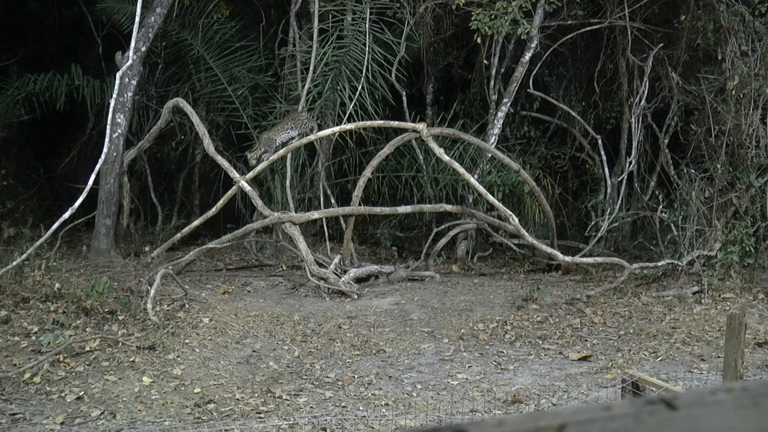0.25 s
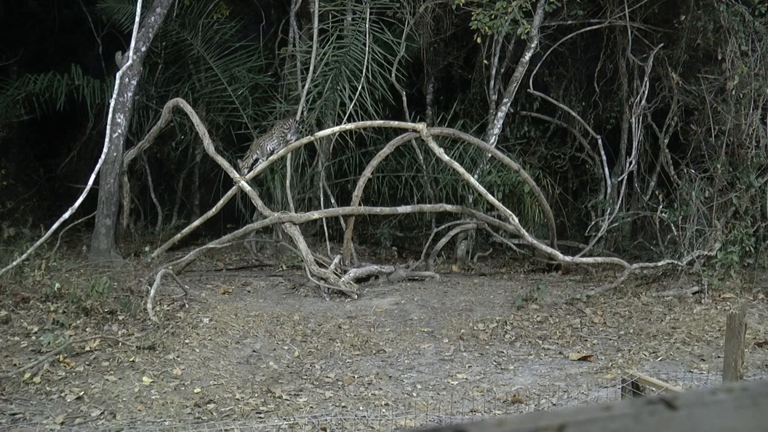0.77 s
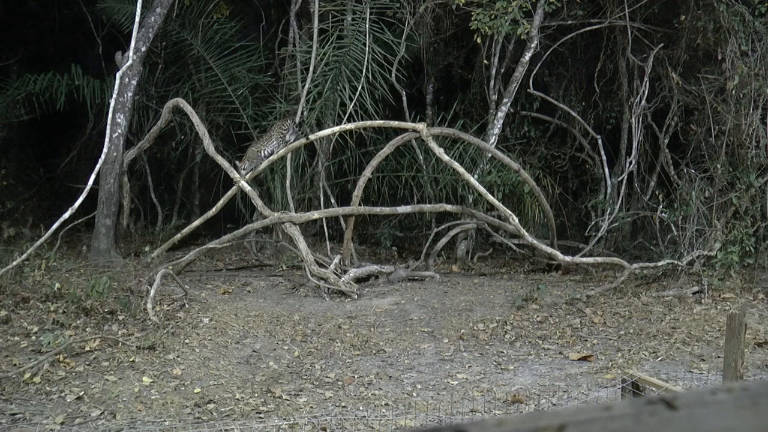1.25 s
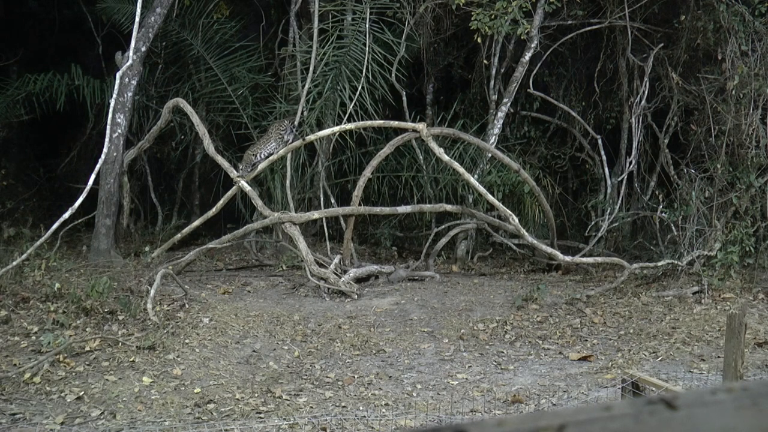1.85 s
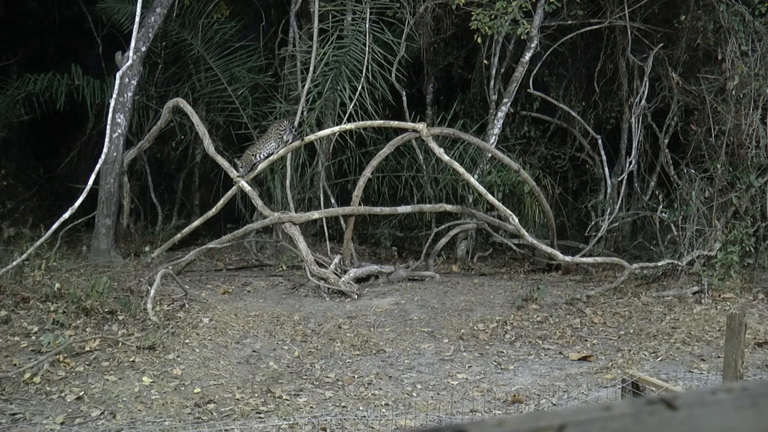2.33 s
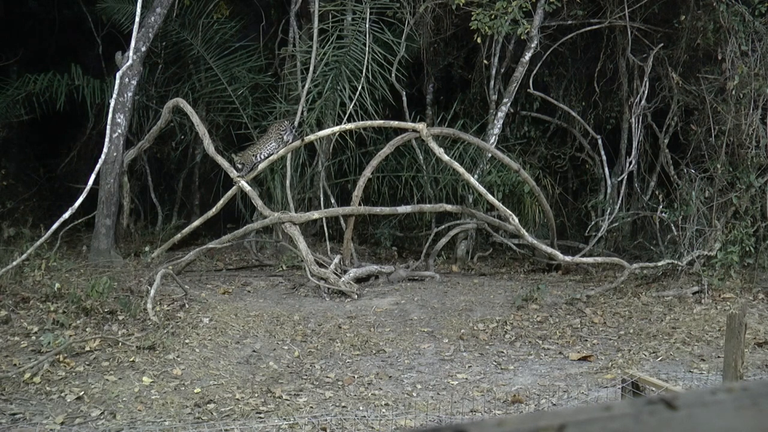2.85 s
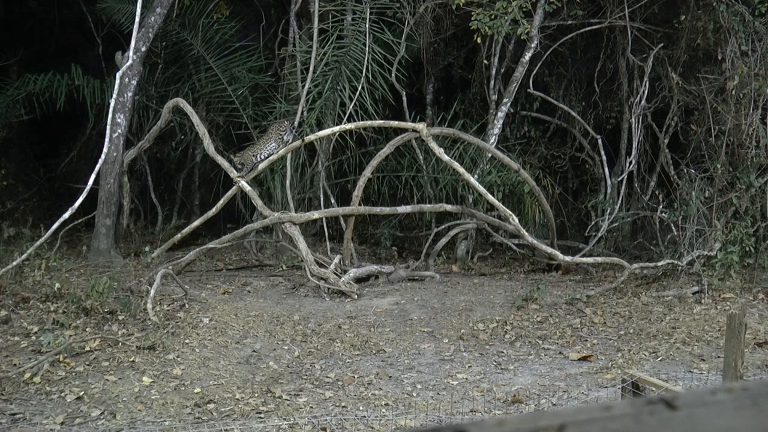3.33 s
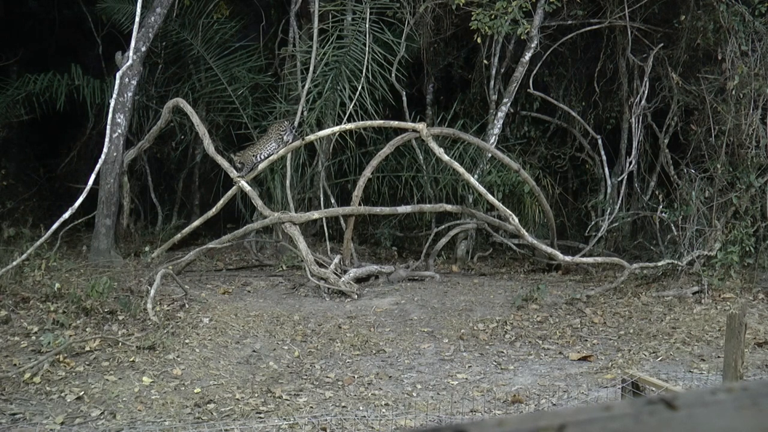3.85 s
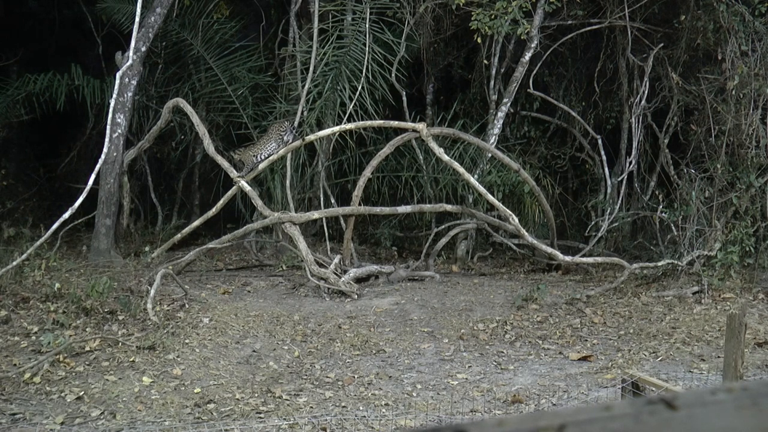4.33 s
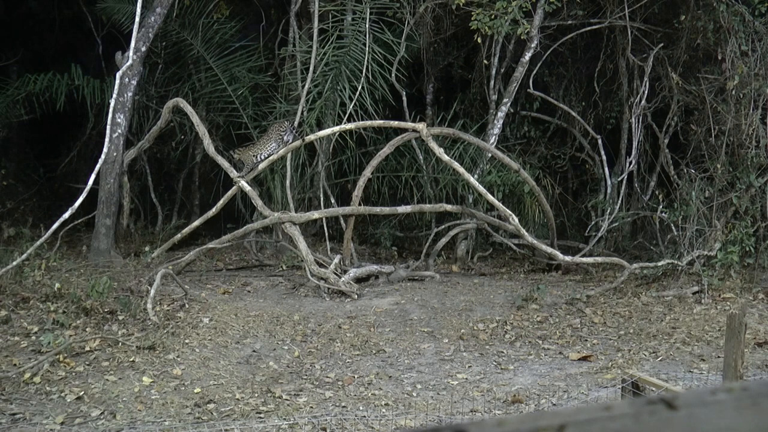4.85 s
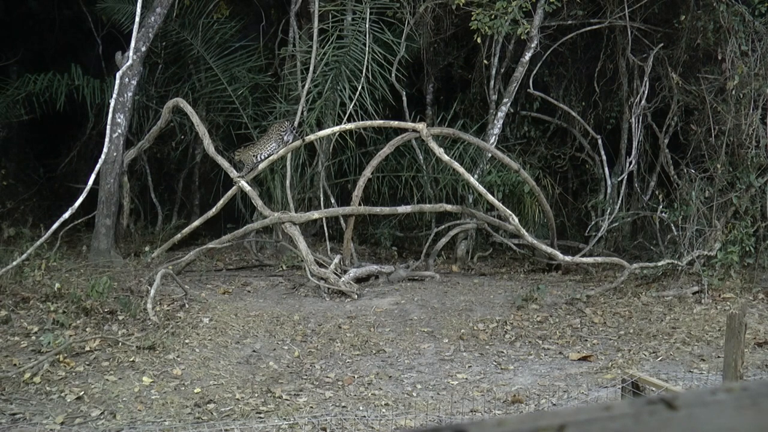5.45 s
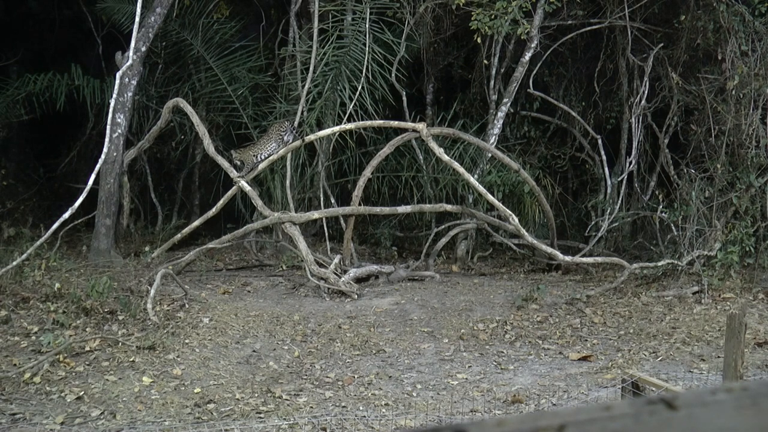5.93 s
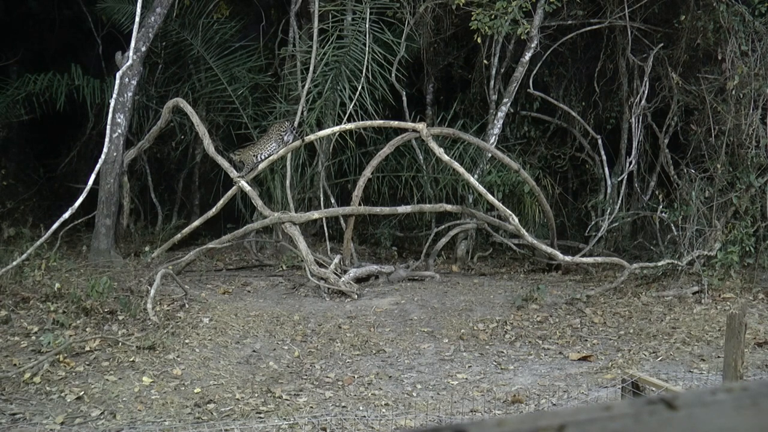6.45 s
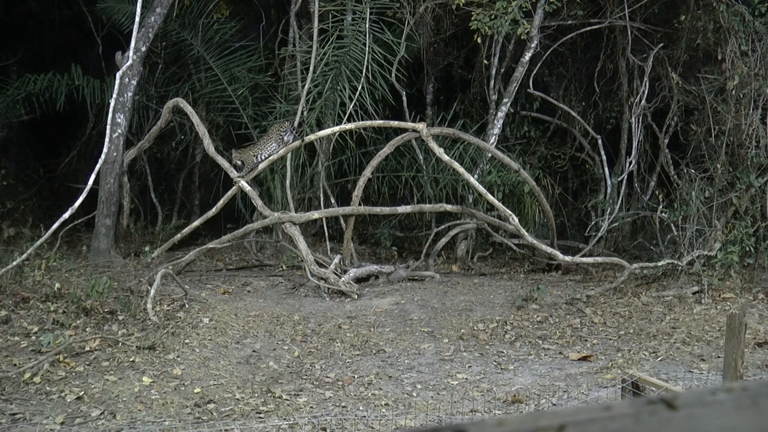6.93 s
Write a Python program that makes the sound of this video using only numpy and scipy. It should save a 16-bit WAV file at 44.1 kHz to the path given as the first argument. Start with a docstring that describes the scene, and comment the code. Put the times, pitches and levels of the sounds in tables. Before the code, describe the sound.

Night insects trill steadily in a forest while dry leaves rustle, twigs snap and a few soft knocks sound on wood.

```python
"""A forest clearing at night. From the start a near katydid scrapes out a high trill with its wings,
over faint air, a cricket chorus and a far buzz. At once dry leaves rustle, bark scrapes and twigs snap,
then return now and then. One cricket begins trilling in bouts, and far insects chirp at their own pace.
After a second a far bird calls. Faint taps lead to soft, close knocks on ringing wood near three seconds.
From four seconds an insect rasps three times, and a low rumble joins the last knocks near seven."""
import sys
import numpy as np
from scipy import signal
from scipy.fft import rfft, irfft
from scipy.io import wavfile
from scipy.ndimage import uniform_filter1d

SR = 44100
rng = np.random.default_rng(int(sys.argv[2]) if len(sys.argv) > 2 else 0)


def bounce(signal):
    """Save signal as a 16-bit WAV file at the path given by the first command-line argument."""
    frames = np.transpose(np.atleast_2d(signal))
    limited = np.clip(frames, -1, 1)
    pcm = np.round(limited * 32767).astype(np.int16)
    wavfile.write(sys.argv[1], SR, pcm)


N = 316638
TIME = np.arange(N) / SR

# Levels in a table compare its rows; the functions set the final loudness.
# the hush of the far forest and still air: f/Hz, level/dB
AIR_SPECTRUM = [(25, -26), (60, 0), (110, 0), (300, 3.5), (520, -3.5), (750, -7), (950, -11), (1500, -9),
                (2100, -8.5), (3900, -9.5), (5900, -4.5), (7100, -10), (8400, -3.5), (12000, -19.5),
                (16000, -17.5)]
# many far insects blurred into a lower and a higher hiss: f/Hz, level/dB
LOW_INSECT_HISS = [(2400, -33), (2650, -12.5), (2900, -10.5), (3300, -9), (3450, -23), (3600, -25),
                   (3800, -58)]
HIGH_INSECT_HISS = [(7400, -48), (8000, -7), (8350, -9), (8500, 7.5), (8900, 5), (9010, 4), (9090, -32)]
# how alike the background is on the left and right: f/Hz, likeness/0-1
STEREO_LIKENESS = [(40, 0.44), (130, 0.21), (300, 0.44), (1400, 0.59), (3100, 0.78), (6800, 1),
                   (11000, 0.48), (15000, 0)]
# how fast the katydid's wings stroke: t/s, rate/Hz
WING_RATE = [(0, 29.82), (2, 29.73), (2.6, 29.68), (7.2, 29.71)]
# the bursts within one wing stroke: place/strokes, half length/strokes, f/Hz, level/dB
WING_BURSTS = [(.12, .025, 8600, -2), (.17, .025, 8546, -2), (.29, .11, 8895, -3.3), (.355, .022, 8765, -3),
               (.48, .075, 8895, -2), (.625, .028, 8600, 2), (.70, .022, 8500, -3), (.81, .035, 8421, -4.5),
               (.965, .025, 8500, -8.5), (.6, .11, 8425, -12)]
# the crickets of the chorus: f/Hz, pulse rate/Hz, level/dB
CHORUS_CRICKETS = [(3305, 86, -62), (3255, 52, -65), (3190, 103, -67.5), (3090, 44, -66.5), (2980, 62, -68),
                   (2900, 73, -71), (3355, 22.5, -70)]
# moments when the buzz grows louder: t/s, half length/s, rise/dB
BUZZ_RISES = [(1.88, 0.11, 4.5), (4.42, 0.22, 3), (6.25, 0.17, 5.5)]
# dry leaves shifting: t/s, length/s, level/dB, f/Hz, half width/octaves
LEAF_RUSTLES = [(0.072, .1, -55.5, 3270, 1.48), (0.29, .075, -59.5, 6500, 1.1),
                (0.819, 0.29, -64.5, 2460, 2), (2.419, .22, -62, 2740, 1.94), (2.773, .14, -57.5, 3850, 4),
                (3.323, .3, -59.5, 2330, 2.03), (3.488, .1, -59, 780, 2.55), (4.453, .074, -57, 4000, 0.46),
                (4.905, 0.067, -59.5, 2900, 0.52), (5.147, 0.25, -66.5, 1900, 2.1),
                (5.726, .12, -60, 7100, 0.85), (6.259, 0.36, -62, 2930, 1.86),
                (6.826, .11, -59.5, 5040, 3.4), (7.09, 0.1, -60.5, 5340, 1.5)]
# bark being scraped: t/s, level/dB
BARK_SCRAPES = [(.113, -56), (2.1, -64.5), (4.453, -57)]
# twigs breaking: t/s, level/dB, f/Hz, half width/octaves, decay/s, splinters against the first click/dB
TWIG_SNAPS = [(.159, -38.5, 6500, 0.61, .0039, 10), (.29, -27, 3800, 1.33, 0.0056, 14),
              (2.0576, -38, 2780, 0.42, .0045, -3), (2.7043, -39.5, 1390, .64, .0034, -5.5),
              (2.8959, -28, 1420, 0.9, 0.0065, 22), (2.976, -14, 1740, 0.77, .0017, -9),
              (3.334, -35, 2950, 1.15, 0.015, 10), (3.58, -41, 2260, 0.37, 0.011, 6),
              (4.263, -43.5, 1710, 0.4, 0.011, 3), (5.185, -45, 2630, 0.22, .0026, 0),
              (5.786, -44, 9700, .68, .004, 8), (6.384, -39, 5000, 1, .0025, 3)]
# three far insects that chirp steadily: first t/s, repeat time/s, f/Hz, level/dB
CHIRPING_INSECTS = [(.76, 0.76, 6290, -71.5), (.36, .615, 6670, -76.5), (1.98, 1.005, 4030, -78.5)]
# bird calls, hoarser the wider they are: t/s, length/s, first f/Hz, last f/Hz, width/Hz, level/dB
BIRD_CALLS = [(1.123, 0.32, 1210, 1242, 12, -74), (1.914, 0.27, 1207, 1350, 27, -73.5),
              (2.472, 0.21, 1300, 1400, 14, -75), (5.698, 0.75, 1094, 1039, 560, -72),
              (6.2, 0.607, 1372, 1410, 49, -71), (6.838, 0.46, 1105, 1043, 340, -70.5)]
# dull blows on wood: t/s, level/dB, pitch/times the wood's own
WOOD_KNOCKS = [(2.704, -42, 0.93), (2.896, -28, 1.05), (2.9093, -40, 0.84), (2.9757, -33, 0.95),
               (3.333, -36.5, 2.3), (3.335, -43.5, 0.78), (3.366, -45, 0.85), (4.318, -47, 0.95),
               (6.827, -45, 0.67), (6.98, -50.5, 0.6), (7.117, -44, 0.59)]
# the notes the wood rings with: f/Hz, level/dB, time to fade by 60 dB/s
WOOD_NOTES = [(122.3, -23.5, 0.18), (215.6, -7.5, 0.069), (290, 3.5, 0.056), (390, 3.5, 0.036),
              (579, -2, 0.032), (812, -3, 0.028), (1080, -6, 0.032), (1670, -10, 0.038)]
# rasping insect calls: t/s, length/s, first f/Hz, last f/Hz, level/dB
RASP_CALLS = [(4.22, .43, 5450, 5070, -60.5), (5.426, 0.31, 5790, 5250, -64.5),
              (6.284, 0.25, 5920, 5400, -68)]
# pitches that the microphone housing lifts or weakens: f/Hz, width/Hz, gain/dB
HOUSING_BANDS = [(493, 39, -22), (777, 120, 4), (902, 164, -9.5), (1262, 180, -8), (1574, 101, -17),
                 (1720, 290, 2.5), (2260, 230, 2), (2370, 160, -2.5), (6970, 95, 6.5)]


def amp(db):
    """Turns decibels into a number to multiply by."""
    return 10 ** (np.asarray(db) / 20)


def unit_level(x):
    """Scales a signal so its average strength (rms) is 1."""
    return x / np.sqrt(np.mean(x ** 2) + 1e-20)


def curve_at(points, hz):
    """Reads between a table's rows, spacing pitches by octaves."""
    f, value = np.transpose(points)
    return np.interp(np.log(hz + 1), np.log(f), value)


def add(mix, s, sound):
    """Mixes a sound in, starting at s seconds."""
    part = mix[max(round(s * SR), 0):][:len(sound)]
    part += sound[:len(part)]


def angle(hz):
    """The running phase of a wave whose pitch may change."""
    return 2 * np.pi * np.cumsum(hz) / SR


def drift(rate, size=N):
    """A smooth random wander of size about 1, with up to about rate swings a second."""
    f = np.fft.rfftfreq(16384, 1 / 2000)
    slow = unit_level(irfft(rfft(rng.standard_normal(16384)) * np.exp(-(f / rate) ** 2)))
    return np.interp(TIME[:size] * 2000, np.arange(len(slow)), slow)


def band(x, hz, octaves):
    """Keeps the pitches within so many octaves of hz."""
    ratio = 2 ** max(octaves, .05)
    edges = [min(hz / ratio, SR / 3), min(hz * ratio, SR / 2 - 1000)]
    return signal.sosfilt(signal.butter(3, edges, "band", fs=SR, output="sos"), x)


def among_trees(x, fade_s, echo_db, likeness):
    """Adds stereo echoes off trunks and leaves, which drop 60 dB in fade_s."""
    t = TIME[:SR // 2]
    echoes = rng.standard_normal((3, len(t))) * (rng.random((3, len(t))) < 2000 / SR)
    echoes *= amp(-60 * t / fade_s) * (t > .004)
    echoes /= np.linalg.norm(echoes, axis=1, keepdims=True)
    tail = np.sqrt(likeness) * echoes[0] + np.sqrt(1 - likeness) * echoes[1:]
    return x + amp(echo_db) * signal.oaconvolve(x[None], tail, axes=1)[:, :N]


def forest_hiss(spectrum, patchy_db):
    """Air or far insects blur into stereo noise, with patches that swell and fade."""
    hz = np.fft.rfftfreq(1024, 1 / SR)
    a, b, c, d, patches = rng.standard_normal((5, N // 256 + 5, len(hz)))
    patches = uniform_filter1d(patches, size=14, axis=0)  # smooth over time
    patches = unit_level(uniform_filter1d(patches, size=7, axis=1))  # and over pitch
    likeness = curve_at(STEREO_LIKENESS, hz)
    left = a + 1j * b
    right = likeness * left + np.sqrt(1 - likeness ** 2) * (c + 1j * d)
    frames = np.array([left, right]) * amp(curve_at(spectrum, hz) + patchy_db * patches)
    return unit_level(signal.istft(frames.swapaxes(1, 2), nperseg=1024, noverlap=768)[1][:, :N])


def katydid(uneven_db=1.1):
    """Each stroke drags one wing over the other's ridges, making the same run of ringing bursts."""
    turns = np.cumsum(np.interp(TIME, *np.transpose(WING_RATE))) / SR + .5
    stroke, place = turns.astype(int), turns % 1
    song = np.zeros(N, complex)
    for at, half, hz, db in WING_BURSTS:
        slip, force = rng.standard_normal((2, stroke[-1] + 1))
        phase = 2 * np.pi * (hz * TIME + .095 * slip[stroke])
        burst = np.exp(-((place - at) / half) ** 2 + 1j * phase)
        song += amp(db + uneven_db * force)[stroke] * burst
    effort_db = -rng.exponential(1, stroke[-1] + 1)  # now and then a stroke is weak
    song *= amp(effort_db[stroke] + .4 * drift(5))
    wing = signal.firwin(901, 9030, fs=SR)  # the wing gives off little above its own pitch
    song = signal.oaconvolve(song, wing, "same")
    left = amp(2.5) * (song * np.exp(.65j)).real  # it sits to the left: louder and earlier there
    echoes = among_trees(song.real, fade_s=.25, echo_db=-4, likeness=0) - song.real
    return amp(-52.5) * unit_level(np.array([left, song.real]) + echoes)


def cricket_chorus(sag=.014):
    """Crickets deep among the trees pulse steadily; each pulse sags in pitch as the wings close."""
    song = np.zeros(N)
    for hz, rate, db in CHORUS_CRICKETS:
        turns = np.cumsum(rate * (1 + .0084 * drift(4.3))) / SR
        place = (turns + rng.random()) % 1
        pitch = hz * (1 + .007 * drift(6) + sag * (1 - 2 * place))
        song += amp(db) * unit_level(np.sin(np.pi * place) ** 2 * np.sin(angle(pitch)))
    song = among_trees(song, fade_s=.35, echo_db=-1, likeness=.85)
    return amp(-58.5) * unit_level(song) * amp([[1.], [-1.]])  # a little to the left


def buzzing_cricket(stroke_hz=145.5, depth=.36):
    """Quick wing strokes chop a rough note whose loudness wanders and sometimes swells."""
    chop = 1 + depth * np.cos(angle(stroke_hz + 1.72 * drift(2.42)))
    noise = rng.standard_normal((2, N))
    note = band(noise[0], hz=4967, octaves=.05) + amp(-4) * band(noise[1], hz=4600, octaves=.05)
    swells_db = sum(db * np.exp(-((TIME - s) / half) ** 2) for s, half, db in BUZZ_RISES)
    level_db = -67.5 + 2.4 * drift(.7) + swells_db
    return among_trees(amp(level_db) * unit_level(note * chop), fade_s=.89, echo_db=-3.5, likeness=.68)


def crackle(length, hz, octaves, clump_db, grain_db=3):
    """Rubbing makes clumps of tiny clicks, which fade in and out."""
    size = int(length * SR)
    grains = rng.standard_normal(size) * amp(grain_db * np.minimum(rng.exponential(1, size), 4))
    grains *= rng.random(size) < .07
    clumps = grains * amp(clump_db * drift(100, size))
    return unit_level(band(clumps, hz, octaves) * signal.windows.tukey(size, .45))


def snap(hz, octaves, decay_s, splinter_db):
    """Dry wood breaks with one click, then splinters briefly."""
    t = TIME[:SR // 12]
    splinters = rng.standard_normal(len(t)) * np.exp(-t / decay_s)
    splinters *= amp(splinter_db) / np.linalg.norm(splinters)
    tick = band((t == 0) + splinters, hz, octaves)
    return tick / abs(tick).max()


def leaves_and_twigs(stalks_per_s=16, stalk_lift_db=14.5):
    """Leaves rustle with stalks ticking among them, bark is scraped and twigs break."""
    leaves, twigs = np.zeros((2, N))
    for s, length, db, hz, octaves in LEAF_RUSTLES:
        add(leaves, s, amp(db) * crackle(length, hz, octaves, clump_db=5))
        for place, brightness in rng.random((round(stalks_per_s * length), 2)):
            stalk_hz = hz * 2 ** (octaves * (brightness - .5))
            stalk = snap(stalk_hz, octaves=.99, decay_s=.0015, splinter_db=4.5)
            add(twigs, s + place * length, amp(db + stalk_lift_db) * stalk)
    for s, db in BARK_SCRAPES:
        add(leaves, s, amp(db) * crackle(length=.063, hz=1900, octaves=.41, clump_db=3.5))
    for s, db, *shape in TWIG_SNAPS:
        add(twigs, s, amp(db) * snap(*shape))
    leaves = signal.sosfilt(signal.butter(2, 10000, fs=SR, output="sos"), leaves)  # dulled by distance
    leaves = among_trees(leaves, fade_s=.093, echo_db=-5.5, likeness=.14)
    return leaves + among_trees(twigs, fade_s=.11, echo_db=-16, likeness=.1)


def lone_cricket(pitch_hz=2978, pulse_hz=100.3, first_s=.33, every_s=1.28, bout_s=.455):
    """One cricket trills in regular bouts; evenly spaced tones add up to its pulses."""
    bouts = np.zeros(N)
    for s in np.arange(first_s, N / SR, every_s):
        add(bouts, s, signal.windows.tukey(int(bout_s * SR), .4))
    pitch = pitch_hz + 1.5 * drift(8)
    tones_db = [-4.5, -15, 7, -1, -8, -3.5, -9]
    trill = np.zeros(N)
    for k, db in enumerate(tones_db):
        lag = np.pi * k ** 2 / len(tones_db)  # lower tones come later, so each pulse falls in pitch
        trill += amp(db) * np.sin(angle(pitch - (k - 2) * pulse_hz) + lag)
    return amp(-64.5) * bouts * unit_level(trill)


def fuzzy_tone(length, first_hz, last_hz, width_hz):
    """A gliding note, smeared in pitch by its way through the trees."""
    size = int(length * SR)
    phase = angle(np.linspace(first_hz, last_hz, size))
    note = drift(width_hz, size) * np.cos(phase) + drift(width_hz, size) * np.sin(phase)
    return unit_level(note * signal.windows.tukey(size, .6))


def chirping_insects(chirp_s=.15):
    """Three far insects each repeat a short note at their own steady pace."""
    out = np.zeros(N)
    for first_s, every_s, hz, db in CHIRPING_INSECTS:
        for s in np.arange(first_s, N / SR, every_s):
            add(out, s, amp(db + rng.standard_normal()) * fuzzy_tone(chirp_s, hz, hz, width_hz=76))
    return out


def far_bird():
    """A bird's gliding calls, from clean whistles to hoarse ones."""
    out = np.zeros(N)
    for s, *shape, db in BIRD_CALLS:
        add(out, s, amp(db) * fuzzy_tone(*shape))
    return out


def wood_knocks(rise_s=.00032, hard_db=-40.5, dull_per_db=.42, dull_per_octave=7.9):
    """Faint taps, then knocks, make wood ring briefly; softer and deeper blows are duller."""
    out, t = np.zeros(N), TIME[:SR // 5]
    taps = [(s + .026 * rng.standard_normal(), -55.5 + 2 * rng.standard_normal(), 1.01)
            for s in np.arange(1.37, 2.1, .17)]  # same columns as WOOD_KNOCKS
    for s, db, pitch in taps + WOOD_KNOCKS:
        tilt_db = dull_per_db * min(db - hard_db, 0) + dull_per_octave * min(np.log2(pitch), 0)
        ring = np.zeros(len(t))
        for k, (hz, note_db, fade_s) in enumerate(WOOD_NOTES):
            level_db = note_db + tilt_db * np.log2(hz / WOOD_NOTES[1][0]) - 60 * t / fade_s
            ring += (-1) ** k * amp(level_db) * np.sin(2 * np.pi * hz * pitch * t)
        ring *= 1 - np.exp(-t / rise_s)
        add(out, s, amp(db) * ring / abs(ring).max())
    return out


def rasping_insect(pulse_hz=139.4, depth=.9, swell_db_per_s=10):
    """A rough, fast-pulsing note and its octave grow louder as they sink in pitch."""
    out = np.zeros(N)
    for s, length, first_hz, last_hz, db in RASP_CALLS:
        note = fuzzy_tone(length, first_hz, last_hz, width_hz=590)
        note += amp(-14.5) * fuzzy_tone(length, 2 * first_hz, 2 * last_hz, width_hz=750)
        t = TIME[:len(note)]
        pulses = 1 + depth * np.cos(2 * np.pi * pulse_hz * t)
        add(out, s, amp(db) * unit_level(note * pulses * amp(swell_db_per_s * t)))
    return out


def rumble(start_s=6.78):
    """A rough, low rumble."""
    out = np.zeros(N)
    add(out, start_s, amp(-65.5) * crackle(length=.46, hz=125, octaves=.93, clump_db=3))
    return out


def scene():
    """Insects and a bird over the still forest; leaves and knocks a little to the right."""
    forest = amp(-61.5) * forest_hiss(AIR_SPECTRUM, patchy_db=2.5)
    forest += amp(-65) * forest_hiss(LOW_INSECT_HISS, patchy_db=1.5)
    forest += amp(-63) * forest_hiss(HIGH_INSECT_HISS, patchy_db=1)
    insects = katydid() + cricket_chorus() + buzzing_cricket() + lone_cricket()
    calls = chirping_insects() + far_bird() + rasping_insect()
    far = amp(-.5) * among_trees(calls, fade_s=.32, echo_db=-6.5, likeness=.8)
    near = leaves_and_twigs()
    near += among_trees(wood_knocks() + rumble(), fade_s=.18, echo_db=-10, likeness=.43)
    return forest + insects + far + near * amp([[-.4], [.4]])


def record(dry, top_hz=15900):
    """The microphone housing lifts some pitches and weakens others; the highest treble is cut."""
    for hz, width, db in HOUSING_BANDS:
        ringing = signal.lfilter(*signal.iirpeak(hz, hz / width, fs=SR), dry)
        dry = dry + (amp(db) - 1) * ringing
    treble_cut = signal.firwin(511, top_hz, window=("kaiser", 9), fs=SR)
    return signal.oaconvolve(dry, treble_cut[None], "same")


dry = scene()
out = record(dry)
bounce(out)
```